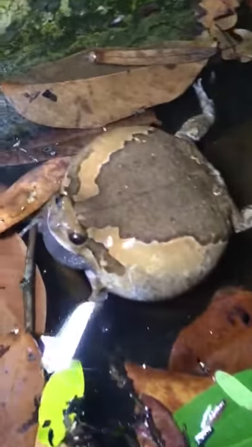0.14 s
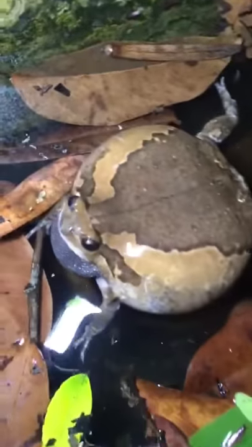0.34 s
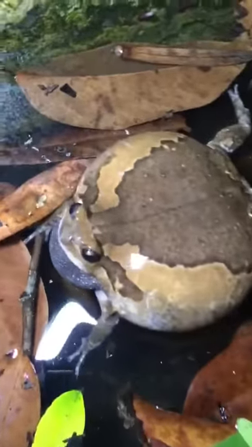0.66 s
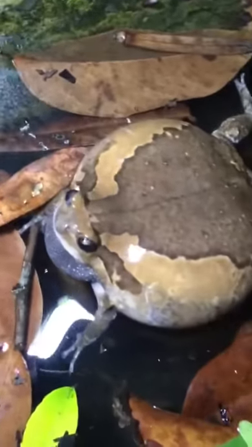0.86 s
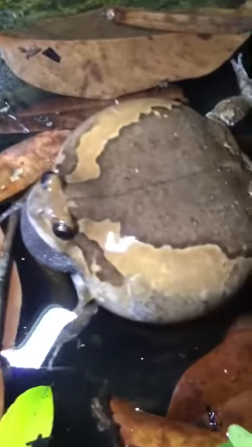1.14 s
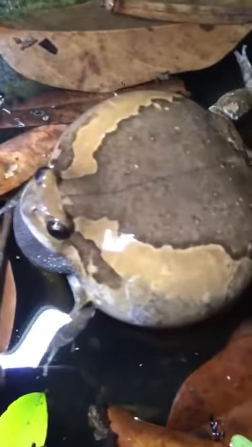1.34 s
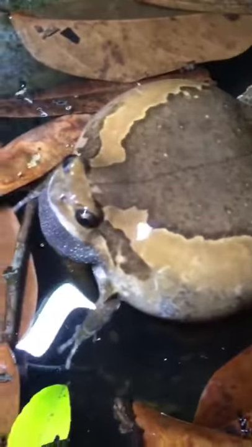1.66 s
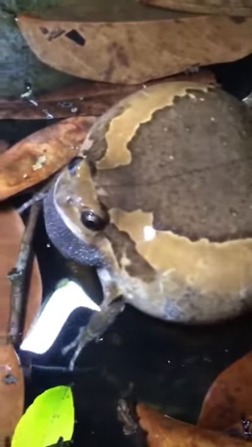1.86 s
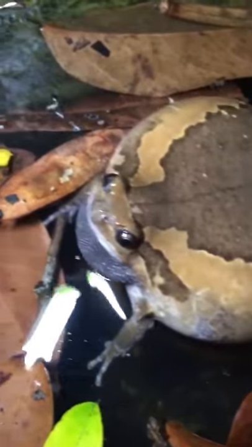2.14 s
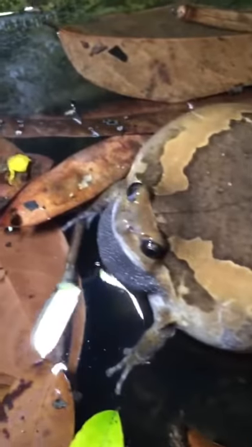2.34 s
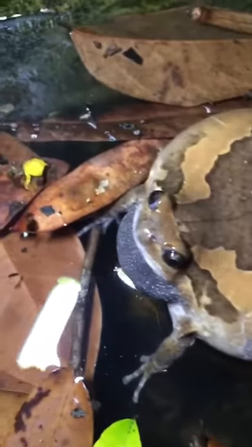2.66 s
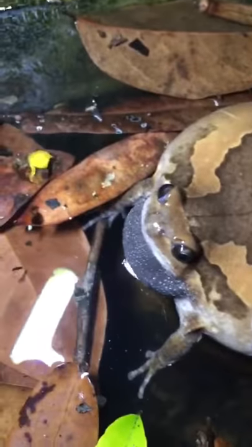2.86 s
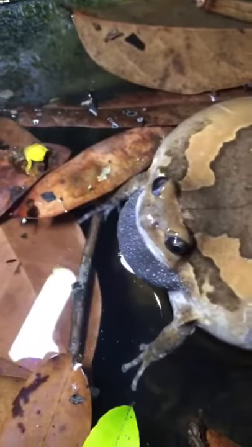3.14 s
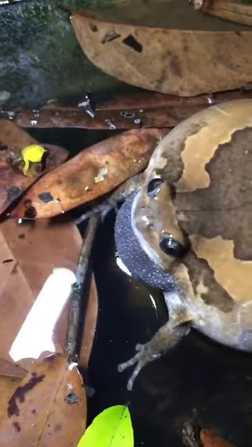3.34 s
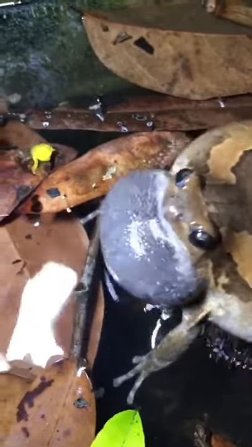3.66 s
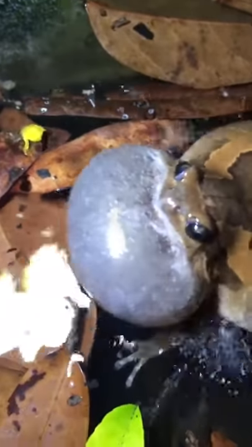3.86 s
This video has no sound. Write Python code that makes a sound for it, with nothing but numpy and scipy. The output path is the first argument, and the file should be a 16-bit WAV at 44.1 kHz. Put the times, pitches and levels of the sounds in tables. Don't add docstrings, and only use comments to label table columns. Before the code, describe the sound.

Bullfrogs drone in overlapping low moans over katydid trill, then a nearby frog bellows loudly

```python
import sys
import numpy as np
from scipy import signal
from scipy.io import wavfile
from scipy.ndimage import uniform_filter1d

SR = 44100
rng = np.random.default_rng(int(sys.argv[2]) if len(sys.argv) > 2 else 0)


def elevation(decibels):
    levels = np.asarray(decibels, float)
    return 10 ** (levels / 20)


def master(y):
    cut = np.clip(np.atleast_2d(y).T, -1, 1)
    pcm = np.round(cut * 32767)
    wavfile.write(sys.argv[1], SR, pcm.astype(np.int16))


N = 176400
T = np.arange(N) / SR

# start_s, pulses_per_s, effort_db
NEAR_CALL = [
    (3.5, 108, -20),
    (3.55, 114.6, -17),
    (3.6, 124.2, -11),
    (3.66, 126, -9.5),
    (3.72, 127.4, -7.5),
    (3.8, 126.3, -9.5),
    (4, 127.3, -13.5),
]
# centre_hz, width_hz, level_db
NEAR_THROAT_MODES = [(338, 74, 5.5), (667, 435, -1.5), (1271.6, 129, 3.5), (1530, 113, 3.5),
                     (2090, 295, -10), (2420, 260, -20.5)]
# start_s, from_hz, to_hz, sag_s, level_db
AIR_LEAKS = [
    (3.698, 11500, 6370, 0.16, -54),
    (3.79, 12800, 7560, 0.19, -62.5),
]
# time_s, pulses_per_s
NEIGHBOUR_PITCH = [
    [(0, 135.5), (.15, 138), (.29, 141.5)],
    [(.24, 124), (.4, 123.2), (.6, 121.8), (.8, 124.8), (1, 127.5)],
    [(.66, 139.5), (.8, 138.2), (.93, 137.5), (1.05, 140), (1.2, 143.5), (1.32, 145)],
    [(.97, 135.5), (1.05, 134), (1.2, 132.1), (1.4, 135.8), (1.6, 141.8), (1.73, 139.3)],
    [(1.22, 129.5), (1.3, 128.4), (1.47, 126.7), (1.6, 129.2), (1.82, 134), (1.93, 132.5)],
    [(1.72, 127.3), (1.88, 128), (2, 124.6), (2.2, 123.8), (2.46, 124)],
    [(2.01, 133), (2.1, 136.3), (2.3, 135.4), (2.42, 136.9), (2.6, 141.8), (2.77, 147.5)],
    [(2.2, 128), (2.45, 130.5), (2.6, 130), (2.7, 133), (2.9, 135), (3.12, 138.6)],
    [(2.64, 144.5), (2.8, 140.2), (2.9, 138.4), (3.1, 139.3), (3.25, 138.4)],
    [(2.6, 124), (2.75, 122.3), (2.9, 123), (3.1, 125.6), (3.32, 127.5)],
    [(3.12, 117.3), (3.52, 117.6)],
    [(3.22, 135), (3.3, 137), (3.4, 141), (3.55, 141.2)],
]
NEIGHBOUR_EFFORT = [
    [-28.5, -27, -29.5],
    [-38.5, -24.5, -22, -22.5, -25],
    [-36, -27, -22.5, -24, -34.5, -36.5],
    [-25, -21, -17.5, -16.5, -27, -33],
    [-28, -22, -19, -19.5, -21.5, -30.5],
    [-26.5, -27, -26, -35, -38],
    [-26.5, -17, -12.5, -14.5, -14, -26],
    [-31, -31, -26, -18.5, -25.5, -24],
    [-25.5, -17.5, -17, -17, -16],
    [-24, -20.5, -20.5, -25.5, -27.5],
    [-30.5, -20.5],
    [-14.5, -23.5, -22, -24],
]
# sac_db, body_db, chest_db, ring_from_hz, ring_to_hz
NEIGHBOUR_VOICES = [(-0.5, -19, -1, 1180, 1190), (-9.5, -19, -4.5, 1360, 1470),
                    (-9, -16.5, -15, 1730, 1400), (-3, -9.5, -20, 1707, 1190), (0, -14.5, -0.5, 1330, 1340),
                    (0.5, -22.5, -7, 1350, 1420), (1, -15, 3, 1375, 1360), (10, -1.5, -1, 1300, 1800),
                    (0, -8.5, 0.5, 1200, 1390), (2.5, -11, -2, 1400, 1860), (4.5, -8.5, -10.5, 1150, 1800),
                    (1, -13, -1, 1500, 1200)]
# start_s, length_s, from_pulses_per_s, to_pulses_per_s, level_db
FAINT_CALLS = [
    (0, .33, 124, 132, -34),
    (.5, .4, 127, 125.5, -33),
    (1.42, .25, 125, 129, -32),
    (2.85, .5, 127, 137, -29),
    (3.2, .35, 133, 134, -30),
]
# time_s, level_db
CROWD_LEVEL = [(0, -34.5), (.6, -24.5), (1.2, -28.5), (1.8, -24.5), (2.3, -26.5), (3, -29), (3.7, -26.5),
               (3.8, -36.5), (4, -39.5)]
# start_s, length_s, from_hz, to_hz, glide_s, strokes_per_s, level_db
SOLOIST = (.49, .455, 4200, 5800, .025, 84.3, -26)
# start_s, length_s, onset_db, hold_db, octave_db
SINGLE_BUZZES = [
    (1.415, .23, -56, -63, -68),
    (2.205, .42, -55, -62, -63),
]
# time_s, peak_db
WING_FLICKS = [(0.475, -50), (0.496, -34.5), (0.5771, -36), (0.6006, -40), (0.6235, -34), (0.6599, -44.5),
               (0.6994, -36), (0.7368, -45), (0.7552, -37.5), (0.839, -53.5)]
# start_s, length_s, level_db
SMALL_FROG_CREAKS = [(.29, .06, -49), (0.483, 0.086, -40), (0.674, 0.095, -42), (1.93, 0.077, -41),
                     (2.07, .05, -40), (2.247, 0.065, -41.5)]
# centre_hz, width_hz, level_db
SMALL_FROG_MODES = [(2505, 650, 0.5)]
# start_s, length_s, from_hz, to_hz, level_db
LOW_TONES = [
    (0.247, 0.089, 240, 106, -43),
    (2.814, 0.1, 200, 110, -46),
    (3.78, .1, 65.8, 62, -42),
]
# time_s, level_db
FAR_LEVEL = [(0, -41), (1, -31.5), (1.8, -28), (1.97, -39), (2.3, -31.5), (2.7, -25.5), (3.4, -23),
             (4, -27)]
# frequency_hz, level_db
FAR_SPECTRUM = [(190, -44), (260, -10.5), (330, -8), (900, -12.5), (1350, 0), (1700, -6), (2600, -32)]
# frequency_hz, level_db
AIR_SPECTRUM = [(30, -19), (150, -2), (2500, -5.5), (4500, -9), (7600, -38.5), (10000, -49.5), (15500, -41)]


def evened(x):
    return x / np.sqrt(np.mean(x ** 2) + 1e-20)


def gate(start, length, edge):
    inside = np.minimum(T - start, start + length - T)
    return np.sin(np.pi / 2 * np.clip(inside / edge, 0, 1)) ** 2


def since(start):
    return np.clip(T - start, 0, 1)


def phase(hz):
    return 2 * np.pi * np.cumsum(hz) / SR


def wander(hz):
    lowpass = signal.butter(2, hz, fs=SR / 32, output="sos")
    coarse = signal.sosfiltfilt(lowpass, rng.standard_normal(N // 32 + 1))
    return evened(np.interp(T, np.arange(len(coarse)) * 32 / SR, coarse))


def resonate(x, hz, width, times=1):
    turn = np.exp(1j * phase(hz * np.ones(N)))
    r = np.exp(-np.pi * width / SR)
    for _ in range(times):
        x = 2 * (turn * signal.lfilter([1 - r], [1, -r], x / turn)).real
    return x


def hiss(points, patchy_db):
    hz = np.fft.rfftfreq(1024, 1 / SR)
    f, db = np.transpose(points)
    a, b, patch = rng.standard_normal((N // 256 + 5, 513, 3)).T
    patch = uniform_filter1d(patch, size=8, axis=0)
    patch = evened(uniform_filter1d(patch, size=14, axis=1))
    colour = np.interp(np.log(hz + 1), np.log(f + 1), db, right=-90)[:, None]
    spectrum = (a + 1j * b) * elevation(colour + patchy_db * patch)
    return evened(signal.istft(spectrum, nperseg=1024, noverlap=768)[1][:N])


def clicks(turns, sizes):
    at = np.flatnonzero(np.diff(np.floor(turns)) > 0)
    part = (turns[at + 1] % 1) / (turns[at + 1] - turns[at])
    out = np.zeros(N)
    out[at] += part * sizes[at]
    out[at + 1] += (1 - part) * sizes[at]
    return out


def near_frog():
    s, rate, db = np.transpose(NEAR_CALL)
    turns = np.cumsum(np.interp(T, s, rate)) / SR + 0.66
    split = np.clip((T - 3.785) / 0.04, 0, 1)
    strong = clicks(turns / 2 + 0.5, np.ones(N))
    weak = clicks(turns / 2 + split * 0.23 / 2, 1 - split * (1 - 0.45))
    dull = signal.lfilter(*signal.butter(2, 2010, fs=SR), weak)
    pulses = strong + weak + split * (dull - weak)

    shut = np.clip(1 - (T - s[0]) / 0.22, 0, 1)
    throat = np.zeros(N)
    for k, (hz, width, level_db) in enumerate(NEAR_THROAT_MODES):
        opening_hz = hz * (1 - 0.35 * shut * (k == 2))
        gain = elevation(level_db - 12 * shut * (k == 3))
        throat += (-1) ** k * gain * resonate(pulses, opening_hz, width)
    throat = signal.sosfilt(signal.butter(2, 2800, fs=SR, output="sos"), throat)

    puffs = signal.lfilter([1], [1, -.985], pulses)
    rasp = evened(puffs * hiss([(7500, -19.5), (12000, 3.5), (15500, -16)], patchy_db=0.0))
    empty = np.clip(1 - (T - s[0]) / 0.1, 0, 1)
    sac = np.sqrt(2) * np.cos(4 * np.pi * turns - .2) * elevation(-18 * empty)
    voice = sac + elevation(-6.5 + 2 * split) * evened(throat) + elevation(-46) * rasp
    out = voice * elevation(np.interp(T, s, db)) * gate(s[0], 1, .02)
    return out + air_leaks(puffs)


def air_leaks(puffs):
    out = np.zeros(N)
    for start, from_hz, to_hz, sag, level_db in AIR_LEAKS:
        hz = to_hz + (from_hz - to_hz) * np.exp(-since(start) / sag)
        out += elevation(level_db) * gate(start, 1, 0.097) * (0.92 + evened(puffs)) * np.sin(phase(hz))
    return out


def call(curve, sac_db, body_db, chest_db, ring_from_hz, ring_to_hz):
    s, rate, db = np.transpose(curve)
    on = slice(max(int(s[0] * SR), 0), int(s[-1] * SR))
    t = T[on]
    coarse_t = t[::64]
    k = np.arange(2, 25)[:, None]
    hz = uniform_filter1d(np.interp(t, s, rate), size=2600, mode="nearest")
    hz = hz * (1 + .0012 * wander(hz=26.2)[on])
    f = k * hz[::64]

    onset_db = 5.5 * np.exp(-(coarse_t - s[0]) / 0.091)
    body = elevation(body_db + onset_db + 1 * (k == 3) + chest_db * ((k == 4) | (k == 5)))
    ring_hz = np.interp(t, s[[0, -1]], [ring_from_hz, ring_to_hz])[::64]
    ring = 1 / (1 + (2 * (f - ring_hz) / 170) ** 2)
    fall_db = -21 * np.maximum(f - 1662, 0) / 1000
    size = (body + ring) * elevation(fall_db + 1.2 * rng.standard_normal(k.shape))
    size[0] = elevation(sac_db)
    size = size / np.sqrt((size ** 2).sum(0).mean() / 2)
    size = np.repeat(size, 64, axis=1)[:, :len(t)]

    harmonics = size * np.cos(k * phase(hz) + 1.62 * rng.standard_normal(k.shape))
    out = np.zeros(N)
    out[on] = harmonics.sum(0) * elevation(np.interp(t, s, db))
    edge = 0.05
    already_on = s[0] < edge
    return out * gate(s[0] - already_on, s[-1] - s[0] + already_on, edge)


def chorus():
    out = np.zeros(N)
    for pitch, effort, voice in zip(NEIGHBOUR_PITCH, NEIGHBOUR_EFFORT, NEIGHBOUR_VOICES):
        curve = [(*point, db) for point, db in zip(pitch, effort)]
        out += call(curve, *voice)
    for s, length, from_rate, to_rate, db in FAINT_CALLS:
        curve = [(s, from_rate, db), (s + length, to_rate, db)]
        out += call(curve, sac_db=-2, body_db=-34.5, chest_db=0, ring_from_hz=1338, ring_to_hz=1338)
    return out


def pond(x):
    t = T[:SR // 2]
    taps = rng.standard_normal(SR // 2) * (t > .012)
    low = signal.lfilter(*signal.butter(2, 1800, fs=SR), taps)
    tail = low * elevation(-60 * t / 0.25) + (taps - low) * elevation(-60 * t / 0.15)
    return signal.fftconvolve(x, tail / np.linalg.norm(tail) * 2)[:N]


WING_HZ, WING_OCTAVE_DB = 5930, -37


def wing(hz, per_s, width):
    turns = np.cumsum(per_s * (1 + .01 * wander(hz=3.97))) / SR + rng.random()
    stroke = np.sin(3 * np.pi * turns) ** 2 * (1 - 1.02 * (turns % 1))
    tone = phase(hz * (1 + width / WING_HZ * .2 * wander(hz=299.6)))
    return evened(stroke * (np.sin(tone) + elevation(WING_OCTAVE_DB) * np.sin(2 * tone)))


def katydids():
    crowd = np.zeros(N)
    for a, b in rng.standard_normal((10, 2)):
        crowd += elevation(0.56 * wander(hz=0.93)) * wing(WING_HZ + 180 * a, 76 + 7 * b, width=330)
    white = rng.standard_normal(N)
    blur = evened(resonate(white, 5950, 880, times=4))
    blur_octave = evened(resonate(white, 11700, 1900, times=4))
    band = evened(evened(crowd) + blur + elevation(WING_OCTAVE_DB) * blur_octave)
    out = band * elevation(np.interp(T, *np.transpose(CROWD_LEVEL)))

    s, length, from_hz, to_hz, glide, per_s, db = SOLOIST
    solo_hz = to_hz + (from_hz - to_hz) * np.exp(-since(s) / glide)
    out = out + elevation(db) * gate(s, length, 0.045) * wing(solo_hz, per_s, width=110)
    notch = signal.butter(4, [7200, 10300], "bandstop", fs=SR, output="sos")
    return signal.sosfilt(notch, out) + buzzes()


def buzzes():
    beat = np.exp(-((T * 105) % 1) / 0.27) * rng.standard_normal(N)
    out = np.zeros(N)
    for s, length, on_db, hold_db, octave_db in SINGLE_BUZZES:
        first = np.exp(-(since(s) / 0.017) ** 2)
        hz = 7300 + (8200 - 7300) * first
        low = evened(resonate(beat, hz, 500, times=2))
        high = evened(resonate(beat, 2 * hz - 400 * first, 500, times=2))
        level = elevation(hold_db + (on_db - hold_db) * first)
        out += gate(s, length, 0.012) * (level * low + elevation(octave_db) * high)
    return out


def flicks():
    white = rng.standard_normal(N)
    low = evened(resonate(white, 7960, 1100, times=3))
    high = evened(resonate(white, 15100, 1100, times=3))
    shape = np.zeros(N)
    for s, peak_db in WING_FLICKS:
        shape += elevation(peak_db - 5) * gate(s - .003, 1, 0.0048) * np.exp(-since(s) / 0.008)
    return shape * (low + elevation(-14.5) * high)


def small_frog():
    turns = np.cumsum(110 * (1 + 0.53 * wander(hz=39.8))) / SR
    rattle = clicks(turns, 1 + 0.43 * rng.standard_normal(N))
    rattle = rattle + 0.095 * rng.standard_normal(N)
    modes = [elevation(db) * resonate(rattle, hz, width, times=2) for hz, width, db in SMALL_FROG_MODES]
    creak = evened(sum(modes))
    return creak * sum(elevation(db) * gate(s, length, 0.017) for s, length, db in SMALL_FROG_CREAKS)


def low_tones():
    out = np.zeros(N)
    for s, length, from_hz, to_hz, db in LOW_TONES:
        hz = np.interp(T, [s, s + length], [from_hz, to_hz])
        out += elevation(db) * gate(s, length, 0.0086) * np.sin(phase(hz))
    return out


def night():
    far = hiss(FAR_SPECTRUM, patchy_db=2.5) * elevation(np.interp(T, *np.transpose(FAR_LEVEL)))
    air = elevation(-45 - 7 * np.exp(-T / 0.29)) * hiss(AIR_SPECTRUM, patchy_db=2.5)
    rumble = elevation(-56) * evened(resonate(rng.standard_normal(N), 69, 98, times=2))
    return far + air + rumble


def scene():
    frogs = chorus()
    near = signal.sosfilt(signal.butter(8, 205, "high", fs=SR, output="sos"), near_frog())
    echoes = elevation(-19) * pond(frogs)
    insects = katydids() + flicks()
    return (near + frogs + echoes + insects + small_frog() + low_tones() + night())[None]


def low_pass(x):
    return signal.sosfilt(signal.butter(12, 15800, fs=SR, output="sos"), x)


def record(dry):
    ceiling = 1.3
    mix = ceiling * np.tanh(dry / ceiling)
    return low_pass(mix)


dry = scene()
out = record(dry)
master(out)
```